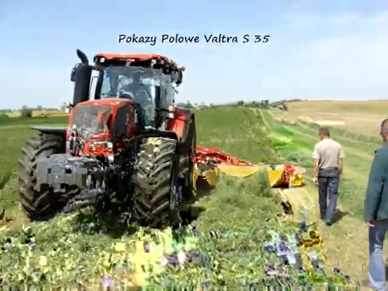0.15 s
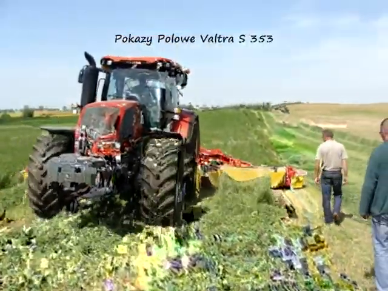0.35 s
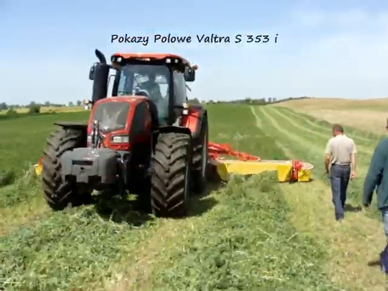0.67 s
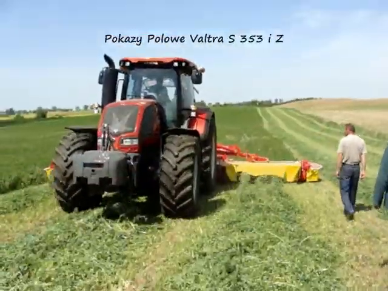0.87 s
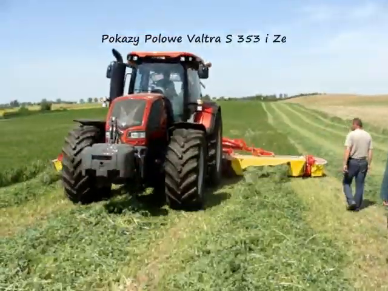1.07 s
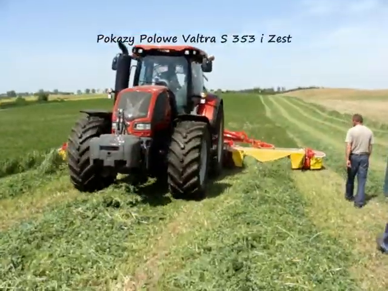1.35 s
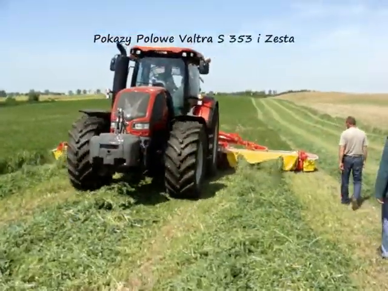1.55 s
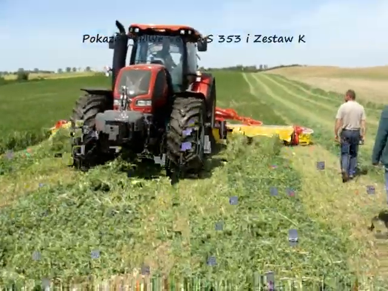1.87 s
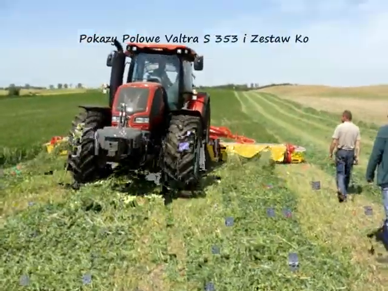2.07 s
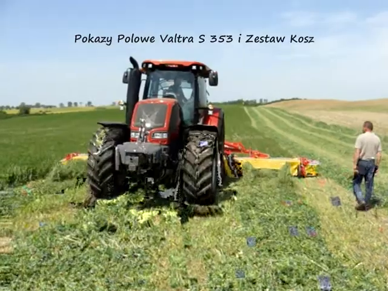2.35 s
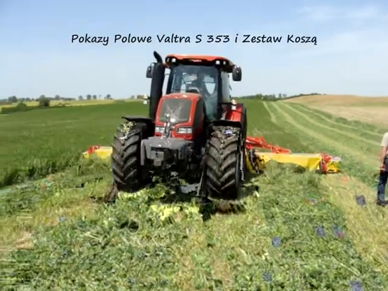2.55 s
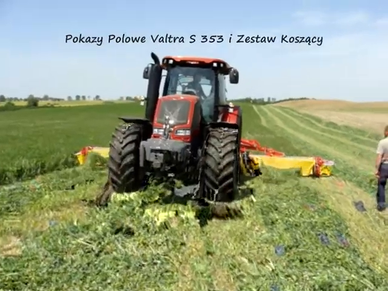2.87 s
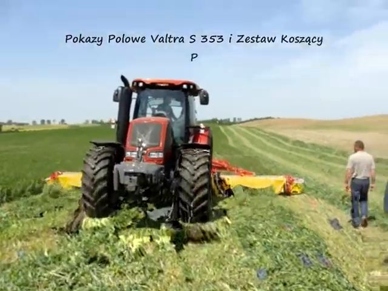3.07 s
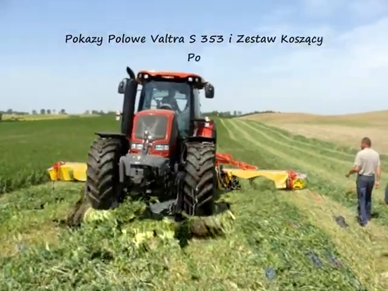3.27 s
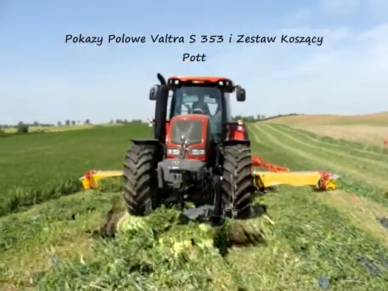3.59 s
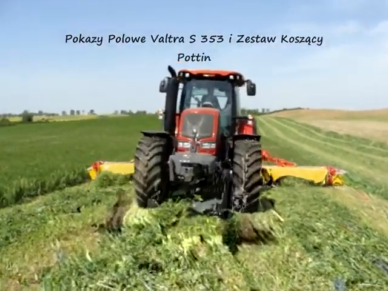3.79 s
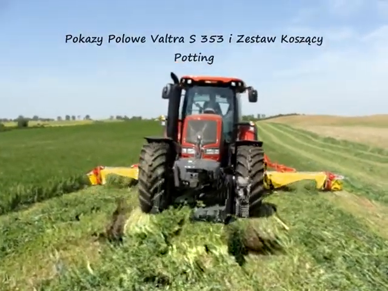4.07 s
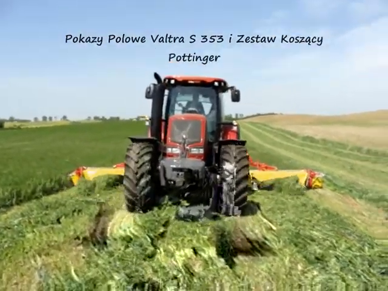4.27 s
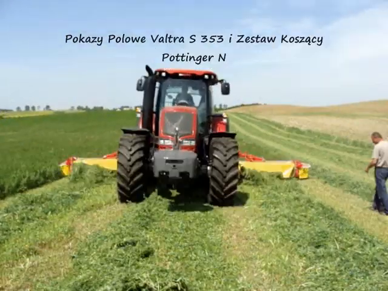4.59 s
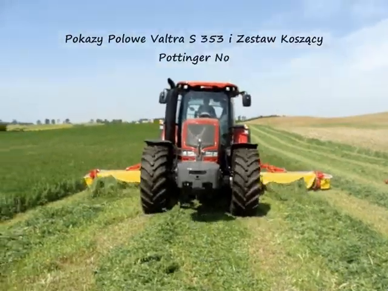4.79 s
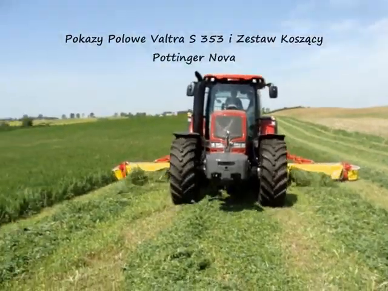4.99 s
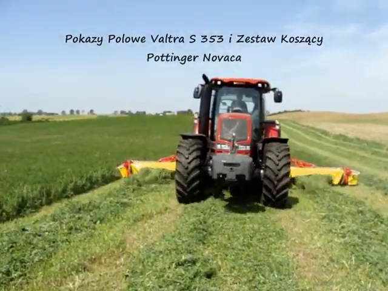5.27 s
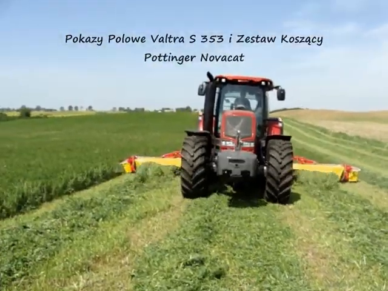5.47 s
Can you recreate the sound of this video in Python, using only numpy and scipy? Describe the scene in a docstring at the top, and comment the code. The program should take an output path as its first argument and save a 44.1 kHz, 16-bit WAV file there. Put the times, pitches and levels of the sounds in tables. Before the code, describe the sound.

The first 0.3 seconds are silent; then a tractor under load cuts in abruptly at full volume and continues without a break to about 5.6 seconds. Its six-cylinder diesel holds almost constant high revs, a buzzing low drone topped by a loud ringing whine near 690 hertz. Gear, mower-disc and shaft tones hum and beat faintly beneath. A broad, bright rush of fan air and cutting blades dominates, blended with a mid-low roar, faint diesel clatter and tiny grass snaps. A thin, breathy turbo whistle glides high up, dipping around 2.7 seconds and then rising. From about 1.9 to 3.2 seconds the tractor turns nose-on: the hollow engine-side noise fades and the hiss grows slightly. The whine drops sharply near 2.9, swells, dips again near 3.7, partly returns around 4, then weakens. Open field, both channels identical, highest treble cut off, no fade at the end.

```python
"""A six-cylinder tractor drones at full revs as it turns from flank to nose, driving disc mowers through tall grass.
The exhaust sounds multiples of the firing rate, one of them ringing loud; gears, discs and shaft sing on theirs.
The turbocharger adds a thin gliding whistle in a breathy skirt, and the open engine side a hollow band of noise.
Filtered noise with diesel clatter and snapping stalks makes the roar and the broad hiss.
The sound cuts in abruptly after a short silence; both channels are the same."""
import sys
import numpy as np
from scipy import signal
from scipy.fft import rfft, irfft, next_fast_len
from scipy.io import wavfile

SR = 44100
rng = np.random.default_rng(int(sys.argv[2]) if len(sys.argv) > 2 else 0)


def int16_out(signal):
    """Quantize to a 16-bit WAV file."""
    q = np.round(np.clip(np.atleast_2d(signal).T, -1, 1) * 32767)
    wavfile.write(sys.argv[1], SR, q.astype(np.int16))


N = 248283

CYLINDERS = 6  # all fire once in each four-stroke cycle
TURN_START_S, TURN_S = 1.9, 1.34  # the swing from flank to nose


def from_db(db):
    """Decibels to gain."""
    return 10 ** (np.asarray(db) / 20)


def unit(x):
    """Scales to an rms of one."""
    return x / np.sqrt(np.mean(x ** 2) + 1e-20)


def curves(rows):
    """Each column of a time table, sample by sample."""
    s, *columns = np.transpose(rows)
    return [np.interp(np.arange(N) / SR, s, column) for column in columns]


def facing(*db):
    """A level that passes through the given values, evenly spaced, as the tractor turns from flank to nose."""
    turned = (np.arange(N) / SR - TURN_START_S) / TURN_S
    return np.interp(turned, np.linspace(0, 1, len(db)), db)


def colour(x, points):
    """Filters x by a spectrum of (Hz, dB) points, joined on a log frequency axis, to unit rms."""
    hz, db = np.transpose(points)
    size = next_fast_len(N)
    f = np.fft.rfftfreq(size, 1 / SR)
    gain = from_db(np.interp(np.log(f + 1), np.log(hz), db))
    return unit(irfft(rfft(x, size) * gain, size)[:N])


def wander(rate_hz):
    """Smooth chance of unit rms that changes up to about rate_hz."""
    size = 2 ** 14  # coarse points across the whole scene
    f = np.fft.rfftfreq(size, N / SR / size)
    slow = irfft(rfft(rng.standard_normal(size)) / (1 + (f / rate_hz) ** 4))
    return unit(np.interp(np.arange(N) * size / N, np.arange(size), slow))


def tone(turns, flutter, rate_hz):
    """A sine of unit rms whose strength and phase flutter in moving air."""
    angle = 2 * np.pi * (turns + rng.random())
    in_step = (1 + flutter * wander(rate_hz)) * np.cos(angle)
    quadrature = flutter * wander(rate_hz) * np.sin(angle)
    return unit(in_step + quadrature)


def exhaust(firings, sway_db=0.5):
    """The low drone: multiples of the firing rate, each beamed its own way; the weak ones flutter most."""
    # exhaust notes: (multiple of firing rate, level from flank [dB], from front corner [dB], head-on [dB])
    notes = [(2, -32.5, -36, -31.5), (3, -42.5, -32.5, -35.5), (4, -30.5, -31, -27.5), (5, -37, -37.5, -27),
             (7, -36.5, -30, -43)]
    # brief dips of single notes: (time [s], multiple of firing rate, half length [s], depth [dB])
    note_dips = [(1.08, 4, 0.26, 4.5), (1.87, 2, 0.22, 13.5), (5.63, 4, 0.29, 11), (5.3, 3, 1, 9),
                 (5.63, 5, 0.29, 5.5)]
    t = np.arange(N) / SR
    drone = np.zeros(N)
    for multiple, *beam in notes:
        db = facing(*beam)
        for s, dipped, half_length, depth in note_dips:
            if round(dipped) == round(multiple):
                db = db - depth * np.exp(-((t - s) / half_length) ** 2)
        flutter = np.interp(db, [-36, -20], [.18, .07])
        level = from_db(db + sway_db * wander(2.2))
        drone += level * tone(round(multiple) * firings, flutter, rate_hz=23)
    return drone


def whine(firings):
    """The sixth multiple of the firing rate rings loud at first, then drops and swells unevenly."""
    # loudest exhaust note: (time [s], level [dB])
    whine_level = [(.31, -19.5), (2.05, -19), (2.82, -22), (2.87, -35), (3.25, -25), (3.72, -39), (4, -27),
                   (4.45, -27), (5.63, -33.5)]
    db, = curves(whine_level)
    return from_db(db) * tone(6 * firings, flutter=.08, rate_hz=16)


def rotor(turns, tones):
    """Tones on whole multiples of a turning part, each drifting a little in strength and phase."""
    return sum(from_db(db) * tone(round(multiple) * turns, flutter=0.24, rate_hz=3.6)
               for multiple, db in tones)


def driveline(firings):
    """Engine gears, mower discs and drive shaft are geared together and beat against each other."""
    # weaker engine and gear tones: (multiple of four-stroke cycle rate, level [dB])
    engine_tones = [(6, -45.5), (9, -49.5), (13, -51.5), (28, -39.5), (33, -37), (39, -47.5), (48, -43.5),
                    (52, -53), (54, -39), (60, -39), (64, -39), (66, -42), (72, -43), (84, -35),
                    (96, -40.5), (104, -41), (123, -35), (132, -37), (156, -42), (280, -39.5)]
    # mower discs, two blades each: (multiple of disc speed, level [dB])
    disc_tones = [(1, -59.5), (2, -48.5), (4, -40), (5, -48), (6, -56.5), (10, -46.5), (12, -48), (20, -44)]
    # slightly faster drive shaft: (multiple of shaft speed, level [dB])
    shaft_tones = [(2, -41), (3, -52), (4, -40.5)]
    disc_turns_per_firing, shaft_turns_per_firing = 0.4645, 0.5105
    engine = rotor(firings / CYLINDERS, engine_tones)
    discs = rotor(firings * disc_turns_per_firing, disc_tones)
    shaft = rotor(firings * shaft_turns_per_firing, shaft_tones)
    return engine + discs + shaft


def turbo(skirt_width_hz=420, skirt_db=-3):
    """A thin whistle in a breathy skirt of intake air; both flare as the pitch crosses the duct's resonance."""
    # blade tone, gliding with the load: (time [s], pitch [Hz])
    blade_pitch = [(0.31, 9262), (0.5, 9250), (0.95, 8920), (1.25, 8872), (1.75, 9373), (2.05, 9480),
                   (2.5, 8543), (2.75, 8296), (3, 8390), (3.55, 8872), (4.8, 9517), (5.63, 9854)]
    duct_hz, duct_width_hz, duct_boost_db = 8930, 300, 9.5
    sway_db, pitch_sway_hz = 1.5, 12  # rms
    hz, = curves(blade_pitch)
    flare = 1 / (1 + (2 * (hz - duct_hz) / duct_width_hz) ** 2)
    db = facing(-39, -41) + duct_boost_db * flare + sway_db * wander(12)
    turns = np.cumsum(hz + pitch_sway_hz * wander(26.7)) / SR
    whistle = tone(turns, flutter=0.42, rate_hz=40)
    # narrow-band noise, shifted up to ride 50 Hz below the blade tone
    pole = np.exp(-np.pi * skirt_width_hz / SR)
    eddies = signal.lfilter([1], [1, -pole], wander(900) + 1j * wander(900))
    carrier = np.exp(2j * np.pi * np.cumsum(hz - 50) / SR)
    skirt = unit((eddies * carrier).real)
    return from_db(db) * (whistle + from_db(skirt_db) * skirt)


def clatter(firings):
    """Injectors and valves knock at the same crank angles in every cycle, never quite equally hard."""
    count = 48  # knocks a cycle
    place, strength = rng.random(count), rng.standard_normal(count)
    cycles = firings / CYLINDERS
    angles = np.arange(int(cycles[-1]) + 1)[:, None] + place
    jitter = 2.5 * rng.standard_normal(angles.shape)  # samples
    at = np.interp(angles, cycles, np.arange(N)) + jitter
    at = np.clip(at, 0, N - 1).astype(int)
    blows = strength * (1 + 0.68 * rng.standard_normal(angles.shape))
    blows = blows * (angles < cycles[-1])  # none past the end
    knocks = np.bincount(at.ravel(), blows.ravel(), N)
    t = np.arange(2048) / SR
    # the dense, short ring of the casting falls 60 dB in 0.03 s
    block = rng.standard_normal(len(t)) * from_db(-60 * t / .03)
    return unit(signal.oaconvolve(knocks, block)[:N])


def stalks(cuts_per_s=2500):
    """Countless small snaps of random size and sign as the blades cut grass."""
    size_db = 3.9 * np.minimum(rng.exponential(1, N), 4)
    snaps = from_db(size_db) * rng.choice([-1, 1], N)
    return unit(snaps * (rng.random(N) < cuts_per_s / SR))


def machine_noise(firings):
    """Low roar and bright rush: turbulent air mixed with faint clatter and cutting."""
    # roar of the engine bay and mower hoods: (frequency [Hz], relative density [dB per Hz])
    roar_spectrum = [(20, -23.5), (70, -13.5), (100, -16.5), (145, -9), (240, -1), (330, 1.5), (400, -3),
                     (540, 2), (650, 3.5), (790, 2.5), (940, -3), (1100, -9), (1500, -25.5)]
    # rush of the fan and the blades: (frequency [Hz], relative density [dB per Hz])
    rush_spectrum = [(700, -27), (1050, -9.5), (1230, -3), (1400, -6), (1620, 2), (1950, 0), (2200, -2),
                     (2450, -1), (4050, -2.5), (4650, -7.5), (5300, -5), (6400, -9.5), (7700, -17.5),
                     (10000, -25)]
    knocks = from_db(-10) * clatter(firings)
    roar = colour(rng.standard_normal(N) + knocks, roar_spectrum)
    throb = 1 + 0.049 * np.cos(2 * np.pi * firings)  # once each firing
    air = rng.standard_normal(N) * throb
    rush = colour(air + knocks + from_db(-6.0) * stalks(), rush_spectrum)
    roar_db = facing(-25.5, -24.5) + 0.69 * wander(9.6)
    rush_db = facing(-17.5, -16) + 0.44 * wander(12)
    return from_db(roar_db) * roar + from_db(rush_db) * rush


def engine_side():
    """A hollow band of engine-bay noise that fades as the flank turns away."""
    # honk of the open engine side: (frequency [Hz], relative density [dB per Hz])
    honk_spectrum = [(900, -26), (1080, 2.5), (1200, -2), (1330, -5), (1550, -32)]
    honk = colour(rng.standard_normal(N), honk_spectrum)
    return from_db(facing(-33, -46.5)) * honk


def scene():
    """The exhaust, driveline and clatter turn with the crankshaft; both channels carry the same sound."""
    # engine speed, sagging and recovering under load: (time [s], firing rate [firings per s])
    firing_rate = [(0.31, 115.11), (0.6, 115.99), (1.25, 114.34), (1.6, 114.17), (2.2, 116.69),
                   (2.8, 114.47), (3.5, 114.97), (5.63, 114.73)]
    firings = np.cumsum(curves(firing_rate)[0]) / SR  # running count
    tones = exhaust(firings) + whine(firings) + driveline(firings) + turbo()
    mix = tones + machine_noise(firings) + engine_side()
    return np.array([mix, mix])


def record(dry):
    """Silence until the sound cuts in; the highest peaks are rounded off; then the treble is cut."""
    start_s, edge_hz, ceiling = 0.311, 10050, 0.85  # ceiling in full scale
    running = np.arange(N) / SR >= start_s
    rounded = dry / (1 + (dry / ceiling) ** 6) ** (1 / 6)
    lowpass = signal.firwin(511, edge_hz, window=("kaiser", 9), fs=SR)
    return signal.oaconvolve(rounded * running, lowpass[None], "same", axes=1)


dry = scene()
out = record(dry)
int16_out(out)
```